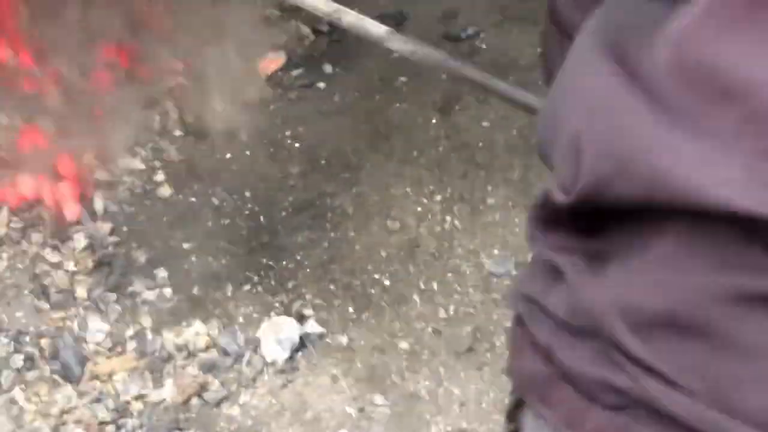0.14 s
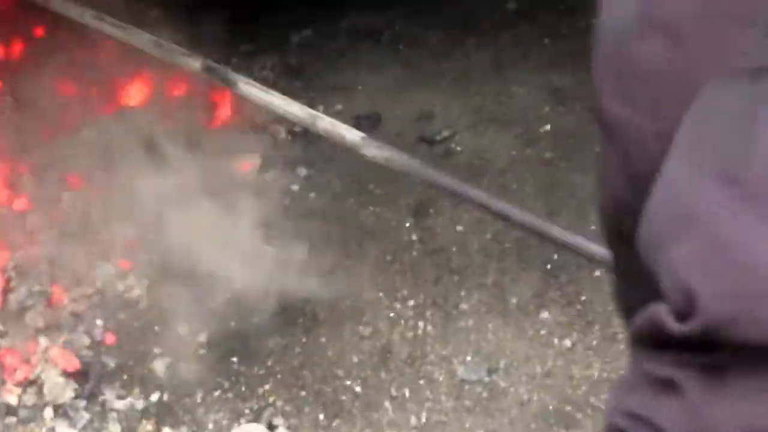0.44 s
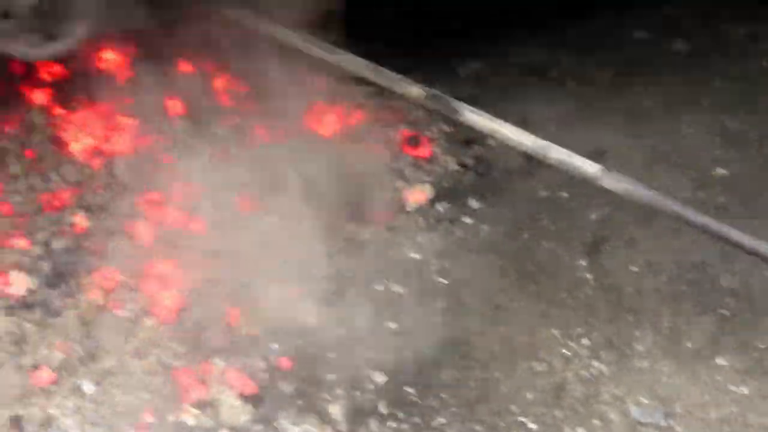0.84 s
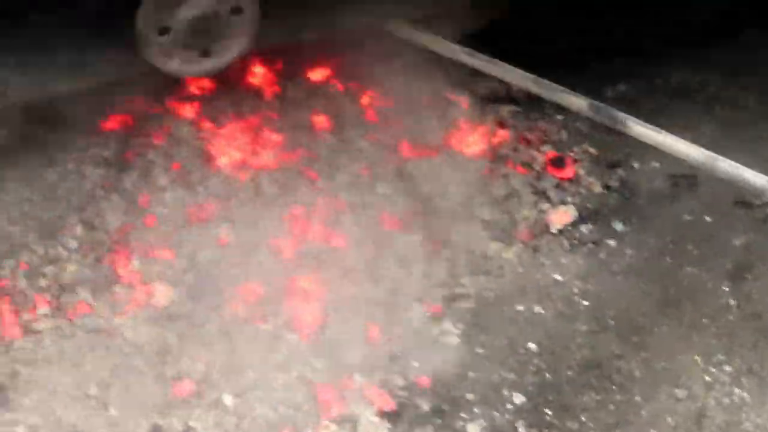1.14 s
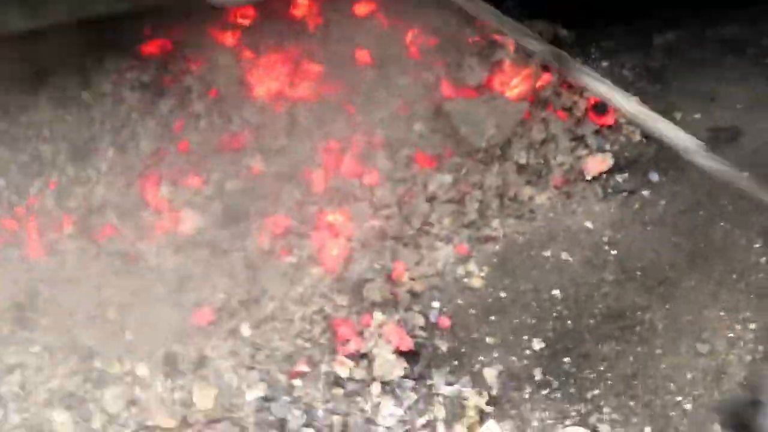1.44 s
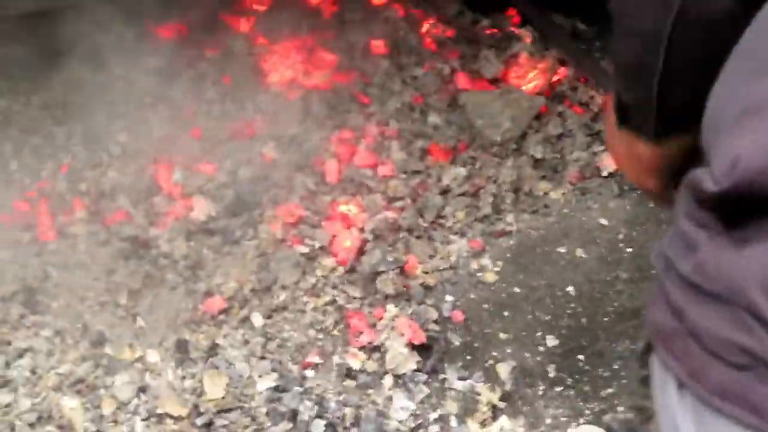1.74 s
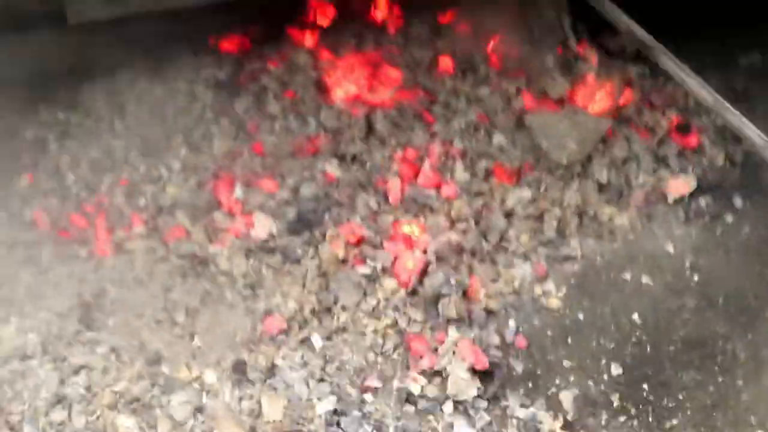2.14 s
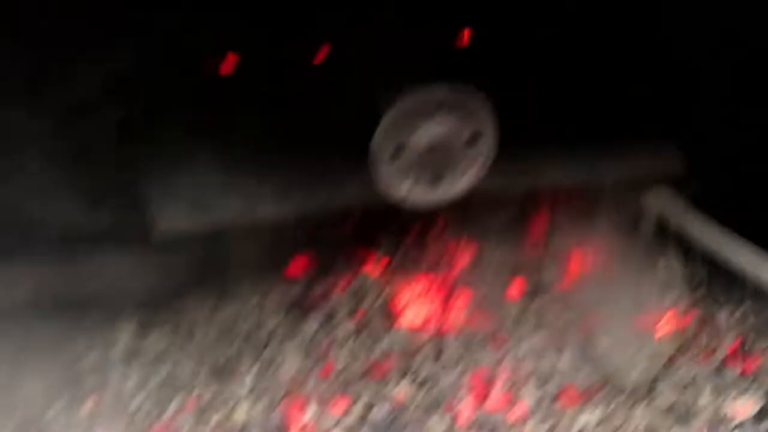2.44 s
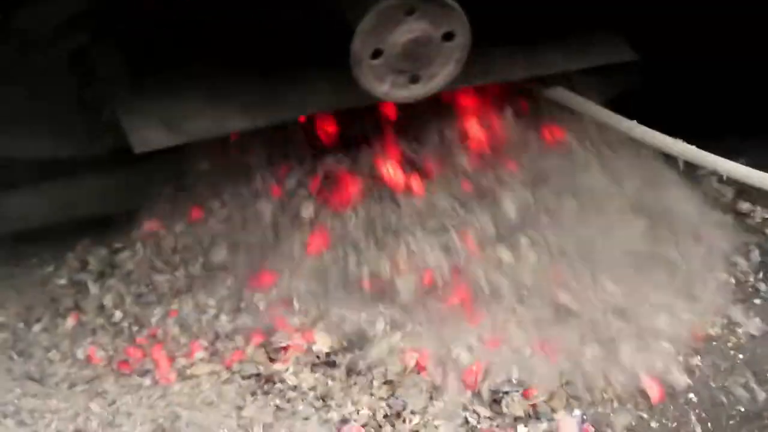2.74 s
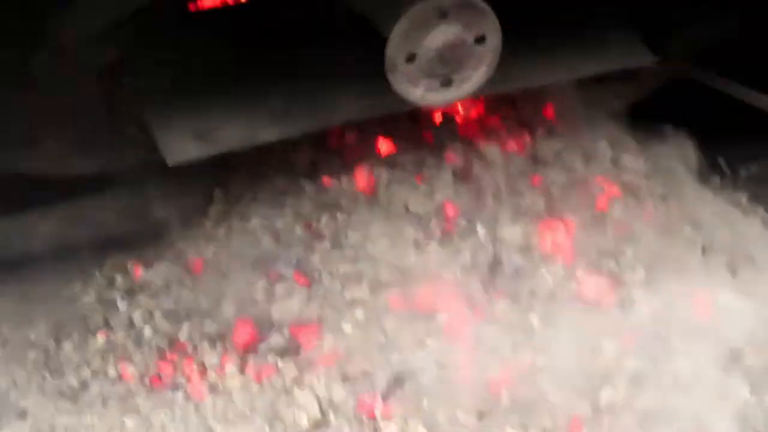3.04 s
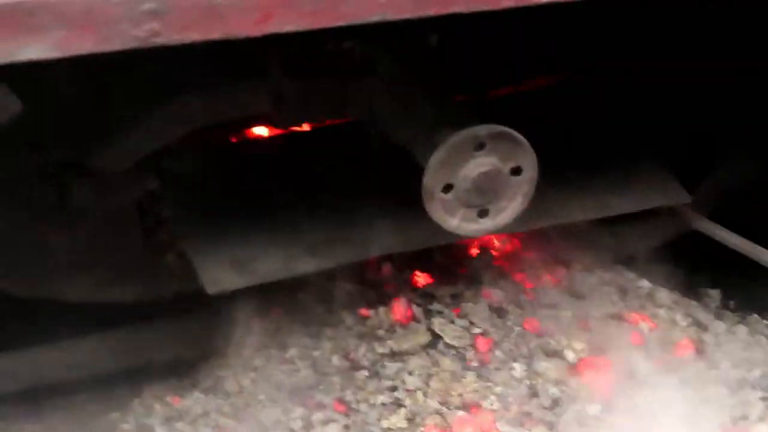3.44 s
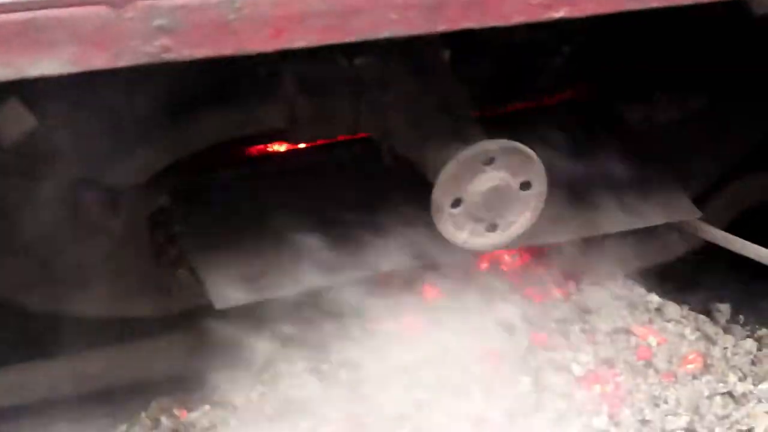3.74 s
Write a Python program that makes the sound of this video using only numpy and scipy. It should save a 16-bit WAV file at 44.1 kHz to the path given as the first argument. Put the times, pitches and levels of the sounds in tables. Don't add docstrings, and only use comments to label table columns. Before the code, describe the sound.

Steam locomotive pump honks rapidly low then high, over engine rumble, then steam hisses steadily

```python
import sys
import numpy as np
from scipy import signal
from scipy.fft import next_fast_len
from scipy.io import wavfile
from scipy.ndimage import uniform_filter1d

SR = 44100
rng = np.random.default_rng(int(sys.argv[2]) if len(sys.argv) > 2 else 0)


def file_out(sig):
    cols = np.atleast_2d(sig).T
    lim = np.clip(cols, -1, 1)
    pcm = np.round(lim * 32767).astype(np.int16)
    wavfile.write(sys.argv[1], SR, pcm)


def convert_level_to_amplitude(level_db):
    exponent = np.asarray(level_db, float) / 20
    return 10 ** exponent


N = 171108


def rms_one(x):
    return x / np.sqrt(np.mean(x ** 2) + 1e-20)


def at_hz(points, hz):
    table = np.array(points)
    return np.interp(np.log(hz), np.log(table[:, 0]), table[:, 1])


def in_time(rows):
    return np.interp(np.arange(N) / SR, *np.transpose(rows))


def drift(rate):
    step = 40
    r = np.exp(-2 * step * np.pi * rate / SR)
    slow = signal.lfilter([1], [1, -2 * r, r * r], rng.standard_normal(N // step + 2002))[2000:]
    return np.interp(np.arange(N) / step, np.arange(len(slow)), rms_one(slow))


def hump(t, rise, fall):
    return np.cos(np.pi / 2 * np.clip(np.where(t < 0, t / rise, t / fall), -1, 1)) ** 2


def resonate(x, hz, width):
    r = np.exp(-np.pi * width / SR)
    a = [1, -2 * r * np.cos(2 * np.pi * hz / SR), r * r]
    once = signal.lfilter([1, 0, -1], a, x)
    return rms_one(signal.lfilter([1, 0, -1], a, once))


def ringing_air(tones, waver_db, rate):
    return sum(convert_level_to_amplitude(db + waver_db * drift(rate)) * resonate(rng.standard_normal(N), hz, width)
               for hz, width, db in tones)


def banded_noise(spectrum, shared_db, own_db, rate, width, lead):
    low, high = spectrum[0][0], spectrum[-1][0]
    edges = np.geomspace(low, high, int(4 * np.log2(high / low)) + 1)
    together = drift(rate)
    white = rng.standard_normal((2, 2, N))
    share = 0.48
    quarter_turn = signal.hilbert(white[:, 0], next_fast_len(N)).imag[:, :N]
    white[:, 1] = lead * share * quarter_turn + np.sqrt(1 - share ** 2) * white[:, 1]
    out = 0
    for k, (a, b) in enumerate(zip(edges, edges[1:])):
        band = signal.butter(2, [a, b], "band", fs=SR, output="sos")
        mid, side = signal.sosfilt(band, white[k % 2])
        hz = np.sqrt(a * b)
        gain = convert_level_to_amplitude(at_hz(spectrum, hz) + shared_db * together + own_db * drift(rate))
        out = out + gain * (mid + convert_level_to_amplitude(at_hz(width, hz)) * side * [[1], [-1]])
    return out / np.sqrt(np.mean(out.mean(axis=0) ** 2))


def hollow(x, share):
    span = 0.014 * SR
    taps = np.zeros(int(span) + 1)
    taps[(rng.uniform(.03, 1, 24) * span).astype(int)] = share * rng.standard_normal(24)
    taps[0] = 1
    return signal.fftconvolve(x, [taps / np.sqrt(np.sum(taps ** 2))], axes=1)[:, :N]


# time in seconds, level in dB.
GUST = [(0, -44.5), (.6, -47.5), (1.05, -58), (1.5, -44), (1.9, -35.5), (2.3, -47.5), (2.9, -67),
        (3.3, -50), (3.88, -50)]


def wind():
    band = signal.butter(2, [55, 267], "band", fs=SR, output="sos")
    low = signal.sosfilt(band, rng.standard_normal(N))
    return convert_level_to_amplitude(in_time(GUST) + 8.6 * drift(7.2)) * rms_one(low) * [[1], [-1]]


# pitch in Hz, side level over middle in dB.
PUMP_WIDTH = [(1200, -28), (2400, -11), (4400, -7.5), (8000, 3), (15000, 11)]
# pitch in Hz, level in dB per Hz.
LEAK = [(1000, -15.5), (2000, 4), (3400, -3.5), (6100, -4), (8600, -15), (12700, -16.5), (15000, -24)]


def leak():
    hiss = banded_noise(LEAK, shared_db=-0.5, own_db=0.2, rate=5.3, width=PUMP_WIDTH, lead=0.68)
    return convert_level_to_amplitude(-37.5) * hollow(hiss, 0.13)


# pitch in Hz, level in dB rms.
HUM = [(33.1, -27.5), (66.1, -41), (99.3, -38.5)]


def hum(near_db):
    t = np.arange(N) / SR
    out = 0
    for hz, db in HUM:
        level = convert_level_to_amplitude(db + 0.75 * near_db + 0.45 * drift(3))
        out = out + np.sqrt(2) * level * np.sin(2 * np.pi * hz * t)
    return out


# pitch in Hz, level in dB per Hz.
ROAR = [(24, -35), (40, -11), (81, -13), (125, -3), (150, -11), (235, -11), (288, -7), (372, -7.5),
        (536, -12), (1800, -28), (2340, -56), (3960, -120)]
# pitch in Hz, side level over middle in dB.
ROAR_WIDTH = [(40, -30), (700, -29), (2000, -31)]
# pitch in Hz, width in Hz, level in dB.
HOLLOWS = [(256, 45, -9), (369.6, 29, -11.5), (446.7, 42, -17), (608, 61, -19.5), (722, 71, -16.5),
           (834, 40, -16.5)]


def roar(near_db):
    fire = banded_noise(ROAR, shared_db=0.67, own_db=2.0, rate=10.4, width=ROAR_WIDTH, lead=0)
    return convert_level_to_amplitude(near_db + 0.5) * (fire + ringing_air(HOLLOWS, 1.55, 10.5))


def honks(rows, rise, hold, fall, rebound, sharp_hz):
    out = np.zeros(N + SR)
    t = np.arange(-SR // 8, SR // 8) / SR
    shape = hump(t - np.clip(t, 0, hold), rise, fall)
    shape = shape + rebound * hump(t - 0.028, 0.02, 0.02)
    for s, db, hz in rows:
        i = int(s * SR) + SR // 8
        pitch = hz + sharp_hz * np.clip(-t / rise, 0, 1) ** 1.5
        turn = 2 * np.pi * np.cumsum(pitch) / SR
        turn = turn - turn[len(t) // 2]
        octave = convert_level_to_amplitude(-21.5) * np.cos(2 * turn)
        out[i:i + len(t)] += convert_level_to_amplitude(db) * shape * (np.cos(turn) + octave)
    return out[SR // 4:][:N] * (1 + 0.05 * drift(40))


# pitch in Hz, width in Hz, level in dB.
SIGHS = [(166, 42, -27.5), (231.5, 63, -28)]


def sighs(tones):
    loud = uniform_filter1d(np.abs(tones), SR // 80)
    return ringing_air(SIGHS, 0, 1) / (1 + loud / 0.06)


# crest in seconds, peak level in dB, pitch in Hz.
LOW_HONKS = [(0.0847, -9.6, 164.2), (0.2457, -10.2, 164.0), (0.4071, -11.2, 163.8), (0.5683, -10.4, 164.5),
             (0.7298, -10.9, 162.3), (0.8907, -8.2, 163.8), (1.0507, -9.4, 164.2), (1.2121, -7.8, 165.4),
             (1.3732, -9.5, 162.9), (1.5332, -7.2, 166.1), (1.6931, -9.5, 164.4), (1.8535, -8.1, 166.8),
             (2.0152, -10.1, 164.2), (2.1753, -9.5, 163.6), (2.3362, -7.8, 166.7), (2.4965, -10.2, 165.0),
             (2.6569, -7.9, 164.5), (2.8179, -7.8, 162.6), (2.9775, -7.8, 165.1), (3.1379, -8.1, 164.7),
             (3.2998, -7.8, 165.6), (3.4572, -9.3, 166.7), (3.6189, -9.0, 166.6), (3.7746, -8.5, 163.2)]
# crest in seconds, peak level in dB, pitch in Hz.
HIGH_HONKS = [(0.1411, -12.3, 220.4), (0.3025, -12.3, 220.8), (0.4637, -11.8, 218.5),
              (0.6256, -11.5, 219.9), (0.7866, -10.8, 219.4), (0.9472, -10.5, 220.0),
              (1.1082, -10.1, 222.2), (1.2697, -9.7, 219.9), (1.4304, -9.4, 220.5), (1.5904, -9.9, 219.6),
              (1.7502, -10.5, 220.4), (1.9105, -9.3, 220.3), (2.0717, -9.1, 221.4), (2.2326, -9.7, 219.2),
              (2.393, -9.8, 220.5), (2.5534, -9.7, 220.5), (2.7135, -10.4, 221.5), (2.8744, -10.5, 220.4),
              (3.0346, -12.6, 223.2), (3.1948, -13.0, 221.3), (3.3514, -12.6, 222.7),
              (3.5127, -12.0, 222.0), (3.6743, -11.8, 223.3), (3.8346, -12.7, 224.1)]
# crest in seconds, peak level in dB, pitch in Hz.
FIRST_HONK = [(-0.027, -11, 213)]
# pitch in Hz, level in dB per Hz.
PANT = [(1300, -25), (2100, -12.5), (2600, 2.5), (3050, -1), (3500, 6.5), (4400, -4), (6000, -9.5),
        (8000, -20)]
# pitch in Hz, width in Hz, level in dB.
PANT_TONES = [(1970, 120, -11.5), (2517, 120, -9.5), (2702, 100, -7.5), (3387, 190, -10), (4230, 210, -10)]


def pump():
    t = np.arange(N) / SR
    lead_s, pant_s = 0.0054, 0.16
    strokes = sum(hump(t - s + lead_s, pant_s * 0.62, pant_s * 0.53) for s, _, _ in LOW_HONKS)
    breath = banded_noise(PANT, shared_db=-0.8, own_db=1.0, rate=2.5, width=PUMP_WIDTH, lead=0.88)
    pant = convert_level_to_amplitude(-37.5) * strokes * (ringing_air(PANT_TONES, 4, 4) + hollow(breath, 0.3))
    low = honks(LOW_HONKS, rise=.036, hold=0, fall=.026, rebound=.46, sharp_hz=16)
    high_rows = list(FIRST_HONK) + list(HIGH_HONKS)
    high = honks(high_rows, rise=.036, hold=.016, fall=.034, rebound=0, sharp_hz=25)
    pipes = low + high
    sway = convert_level_to_amplitude(0.15 * drift(1.6) * [[1], [-1]])
    return (pipes + sighs(pipes)) * sway + pant


# start and end in seconds, start and end pitch in Hz, width in Hz, level in dB.
WHISTLES = [(1.32, 1.36, 2170, 2200, 90, -27), (1.4, 1.98, 6950, 6950, 200, -41),
            (1.68, 1.79, 2750, 2700, 250, -32), (2.0, 2.11, 803, 868, 5, -41),
            (2.4, 2.62, 2200, 2150, 150, -39), (1.4, 4.4, 9650, 9650, 250, -46),
            (1.42, 1.8, 4480, 4500, 70, -41), (2.7, 4.2, 5450, 5480, 100, -47),
            (-0.4, 1.5, 6200, 6100, 250, -52), (1.48, 1.68, 2850, 2900, 250, -39),
            (1.46, 1.51, 825, 760, 8, -40), (1.54, 1.62, 795, 735, 8, -41), (1.68, 1.76, 720, 765, 10, -40),
            (1.7, 1.77, 820, 855, 8, -43), (1.57, 1.66, 605, 575, 8, -40),
            (1.29, 1.36, 9600, 9650, 200, -42), (1.42, 1.95, 7600, 7600, 120, -47),
            (2.76, 2.86, 3400, 3500, 500, -37), (2.9, 3.0, 5450, 5500, 120, -41),
            (1.52, 1.68, 2700, 2700, 250, -38)]


def whistles():
    t = np.arange(N) / SR
    steady_hz = 25
    out = 0
    for s0, s1, hz0, hz1, width, db in WHISTLES:
        turn = 2 * np.pi * np.cumsum(np.interp(t, [s0, s1], [hz0, hz1])) / SR
        wobble = (steady_hz / width + drift(width / 2)) * np.sin(turn) + drift(width / 2) * np.cos(turn)
        half = (s1 - s0) * .6
        out = out + convert_level_to_amplitude(db) * hump(t - (s0 + s1) / 2, half, half) ** .4 * wobble
    return out


# time in seconds, level in dB.
FLOW = [(0.85, -57), (1.2, -45), (1.26, -47), (1.285, -45), (1.302, -31.5), (1.325, -26.5), (1.345, -25.5),
        (1.365, -30), (1.39, -36.5), (1.43, -32.5), (1.49, -32.5), (1.6, -35), (1.75, -32), (1.85, -34),
        (2.41, -33), (2.76, -32.5), (2.97, -32), (3.29, -33.5), (3.88, -32)]
# pitch in Hz, level in dB per Hz.
STEAM = [(590, -27), (1000, -12.5), (1480, -5.5), (2130, 1), (4980, -5), (7020, -5.5), (12000, -15.5),
         (14100, -21.5), (15500, -31)]
# pitch in Hz, side level over middle in dB.
JET_WIDTH = [(700, -24), (1200, -25), (2400, -13), (4400, -10.5), (8000, -5.5), (15000, 3)]
# time in seconds, change of the highest hiss in dB.
TOP_GAIN = [(1.35, -4), (1.39, -13), (1.45, 0.5), (2.2, -1.5), (2.7, 3), (3.88, -2)]


def steam():
    jet = banded_noise(STEAM, shared_db=0.7, own_db=1.5, rate=15.3, width=JET_WIDTH, lead=-1.04)
    move = 0.68 * np.arange(N) / SR
    jet = np.cos(move) * hollow(jet, 0.13) + np.sin(move) * hollow(jet[:, ::-1], 0.13)
    treble = signal.butter(2, 11600, "high", fs=SR, output="sos")
    jet = jet + (convert_level_to_amplitude(in_time(TOP_GAIN)) - 1) * signal.sosfiltfilt(treble, jet)
    flow = [(FLOW[0][0] - .05, -90)] + list(FLOW)
    return convert_level_to_amplitude(in_time(flow) + 4.5) * jet + whistles()


# time in seconds, level of the roar in dB.
NEAR = [(0.0, -27), (0.12, -26), (2.03, -23.5), (3.44, -25), (3.5, -20), (3.51, -25.5), (3.79, -23),
        (3.88, -24.5)]


def scene():
    near_db = in_time(NEAR)
    engine = hum(near_db - near_db.mean()) + roar(near_db)
    return wind() + leak() + engine + pump() + convert_level_to_amplitude([[-.2], [.2]]) * steam()


def band_limit(x):
    return signal.sosfilt(signal.butter(12, 15630, fs=SR, output="sos"), x)


def record(dry):
    mid, side = dry.mean(axis=0), (dry[0] - dry[1]) / 2
    mid = signal.sosfilt(signal.cheby2(10, 40, 15730, fs=SR, output="sos"), mid)
    side = signal.sosfilt(signal.butter(6, 15500, fs=SR, output="sos"), side)
    return band_limit(np.array([mid + side, mid - side]))


dry = scene()
out = record(dry)
file_out(out)
```